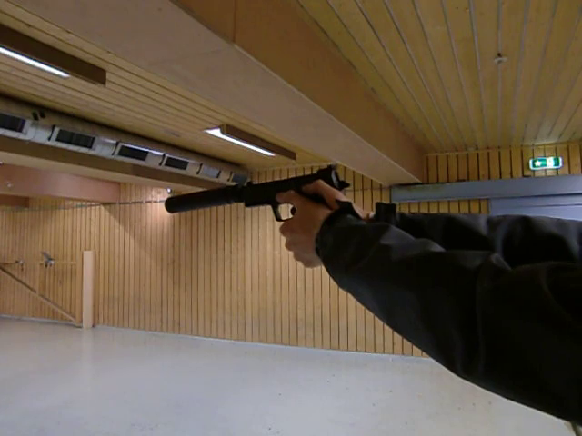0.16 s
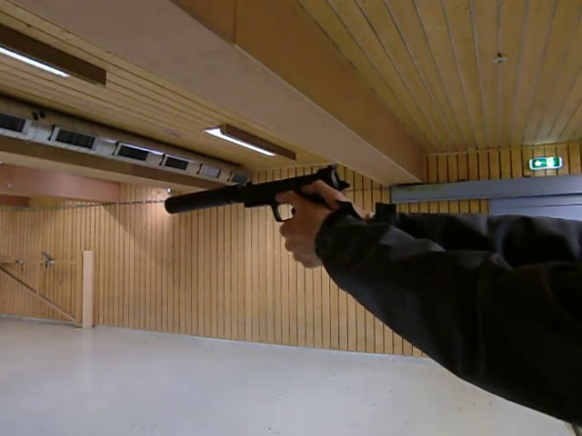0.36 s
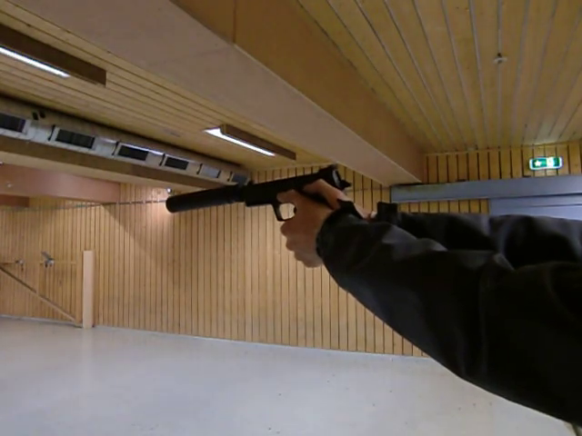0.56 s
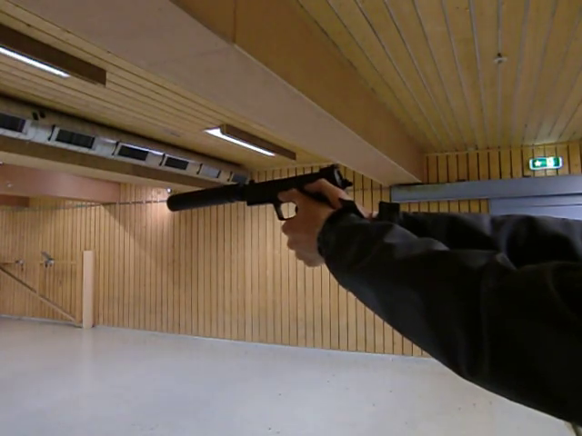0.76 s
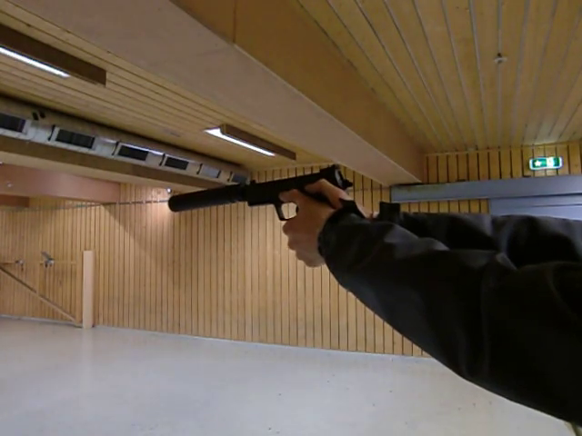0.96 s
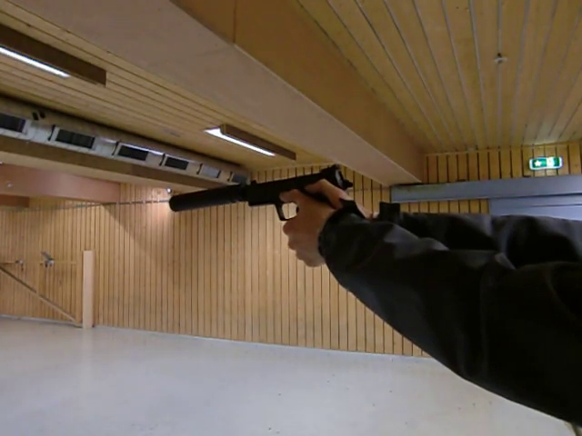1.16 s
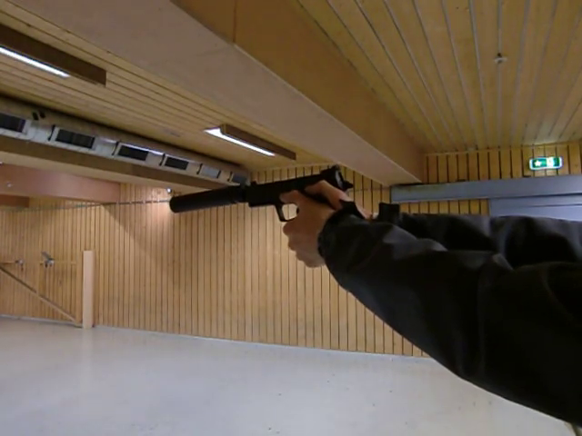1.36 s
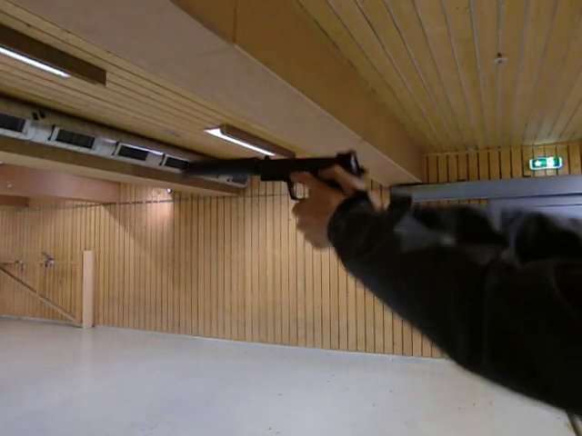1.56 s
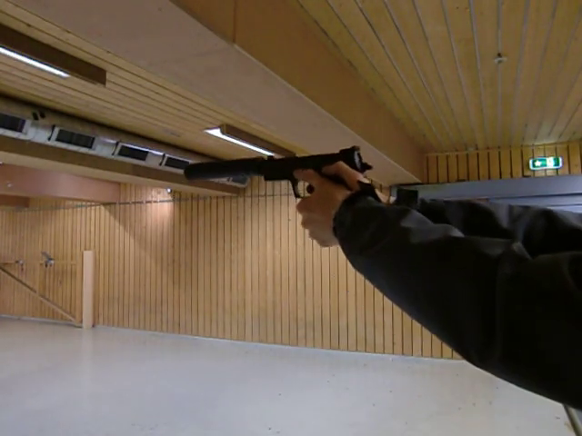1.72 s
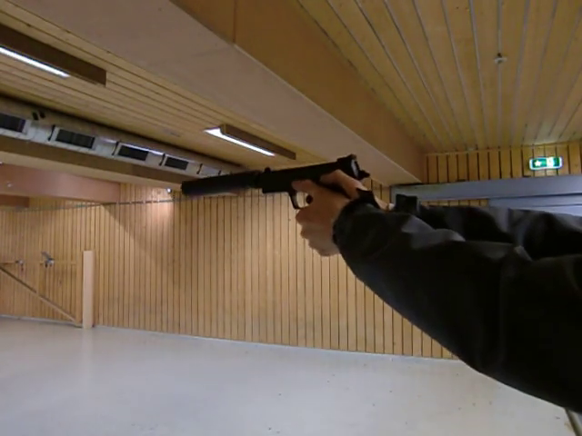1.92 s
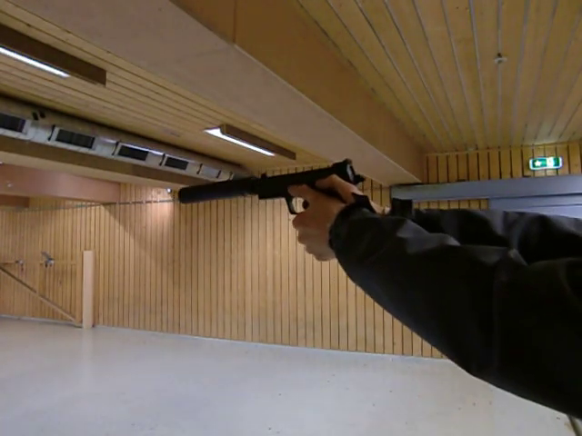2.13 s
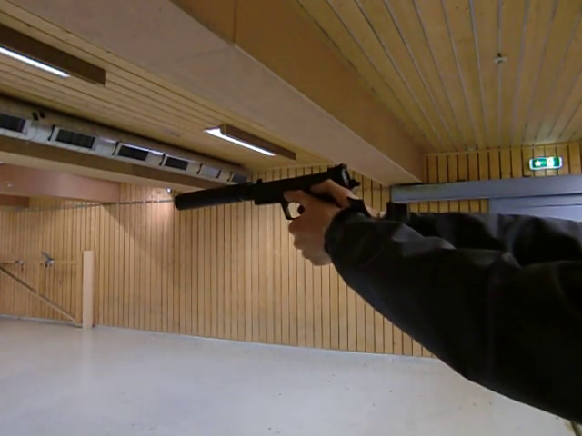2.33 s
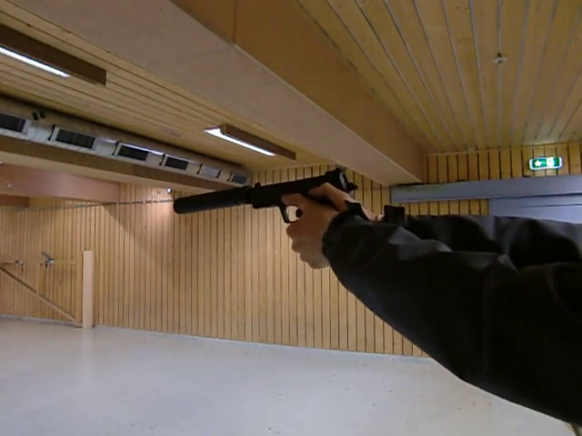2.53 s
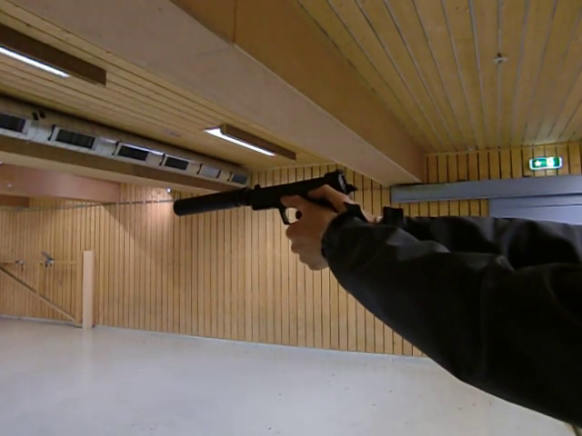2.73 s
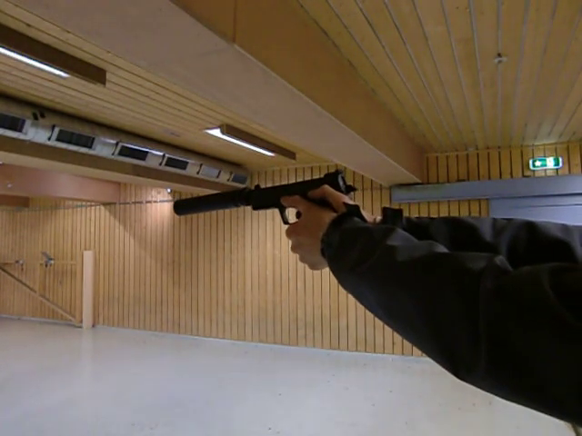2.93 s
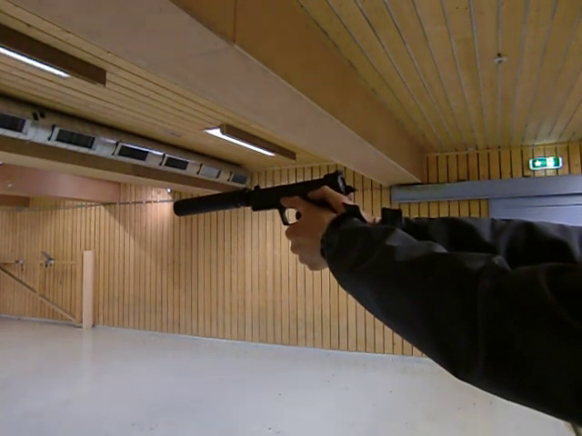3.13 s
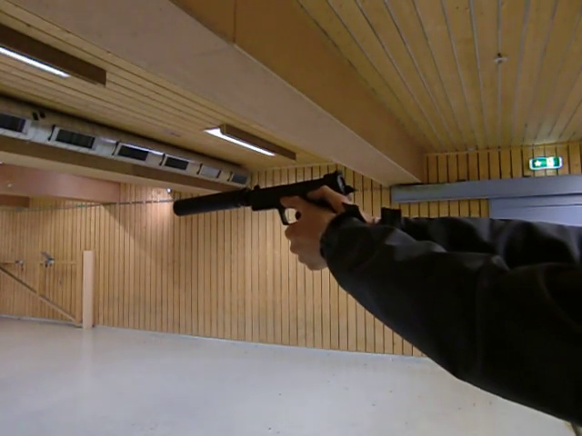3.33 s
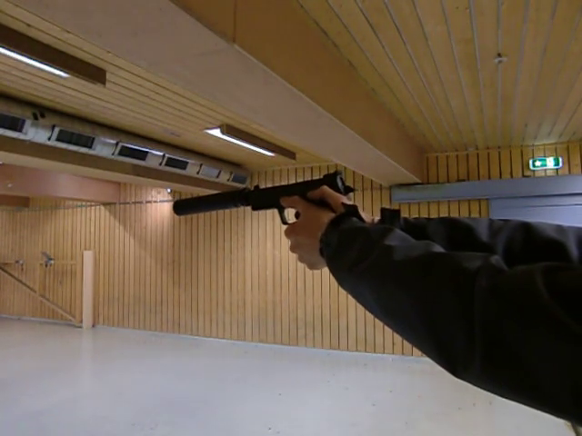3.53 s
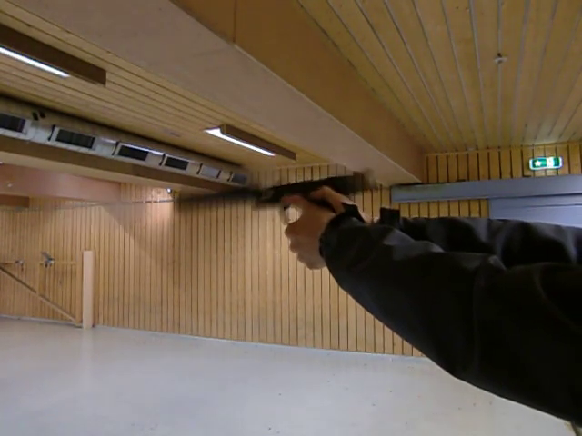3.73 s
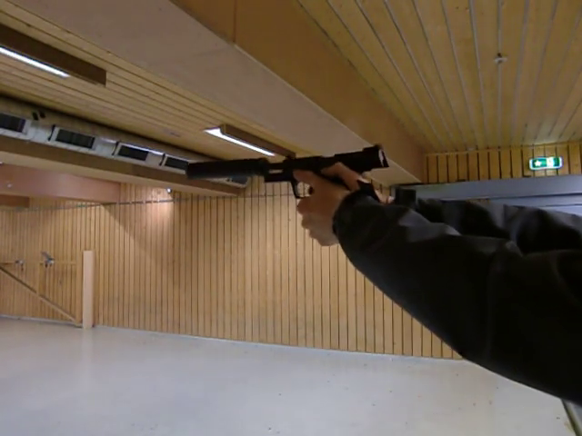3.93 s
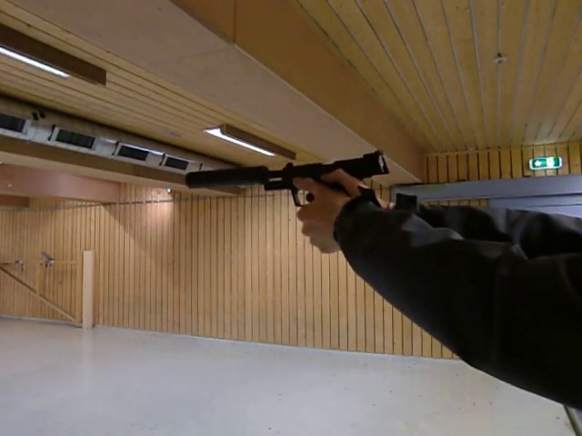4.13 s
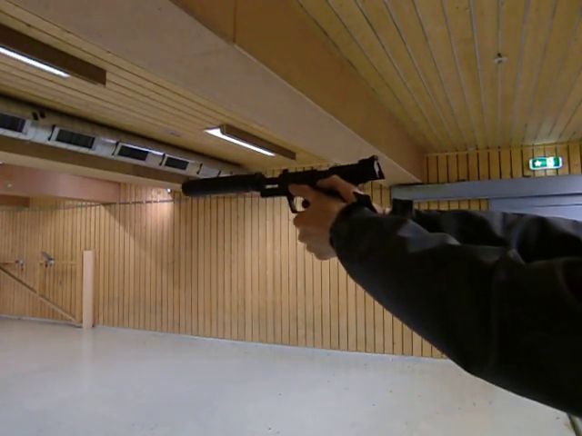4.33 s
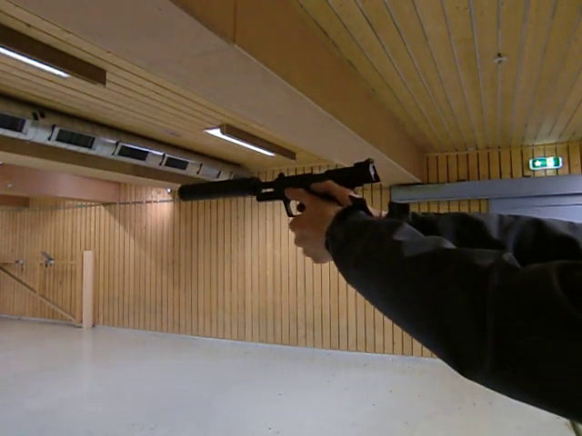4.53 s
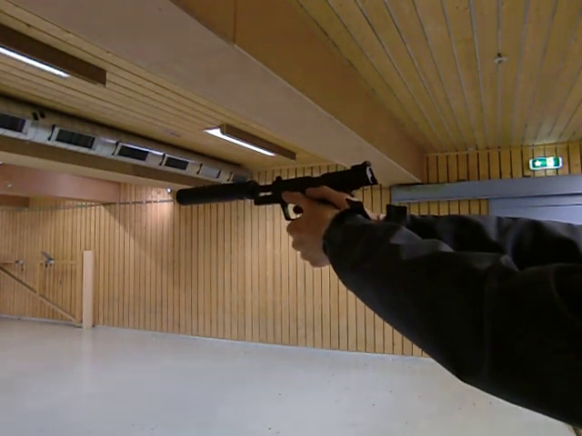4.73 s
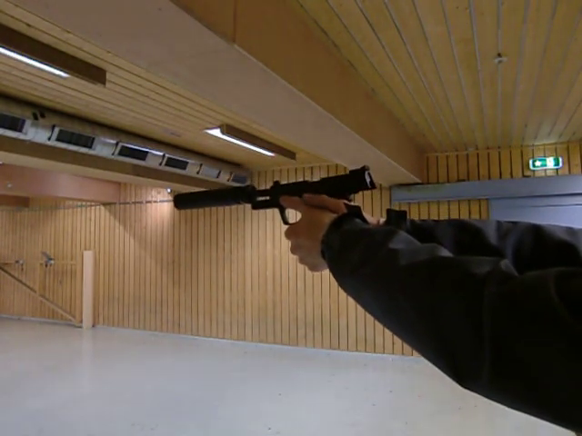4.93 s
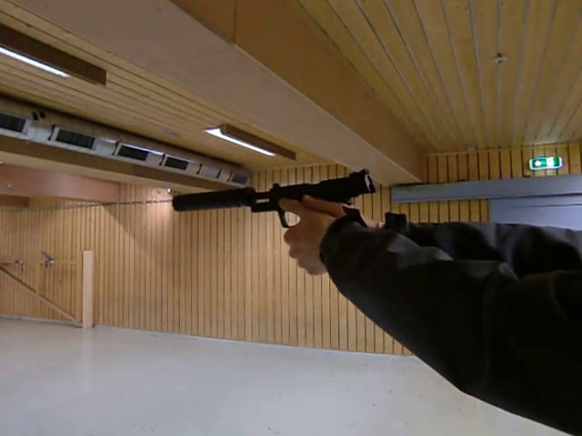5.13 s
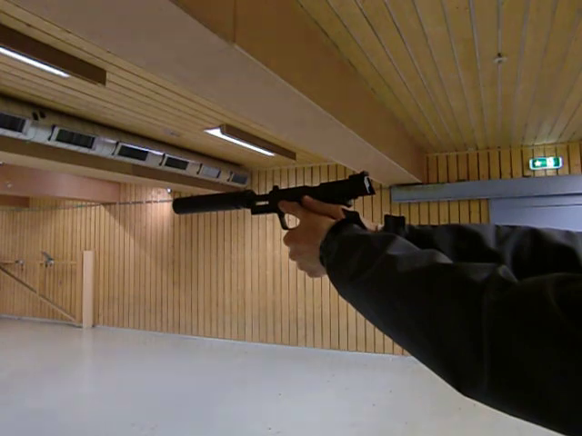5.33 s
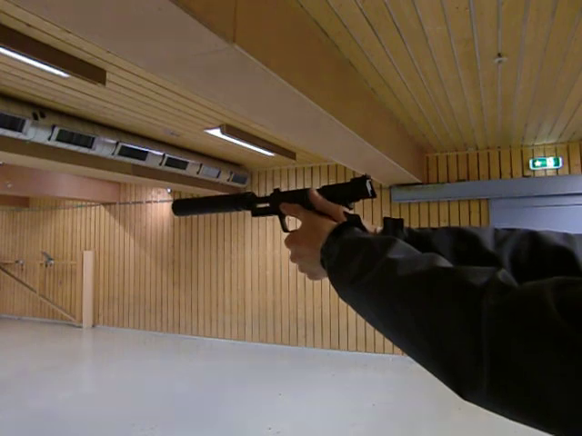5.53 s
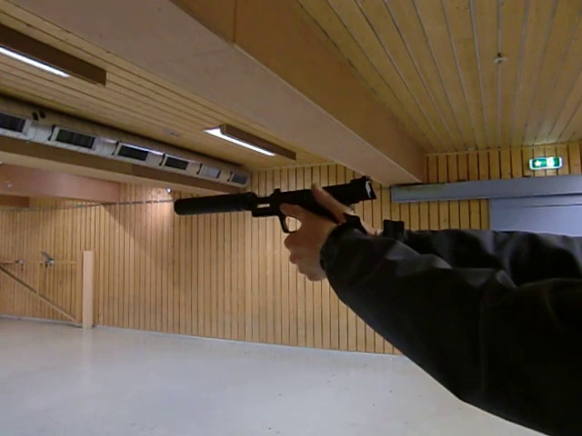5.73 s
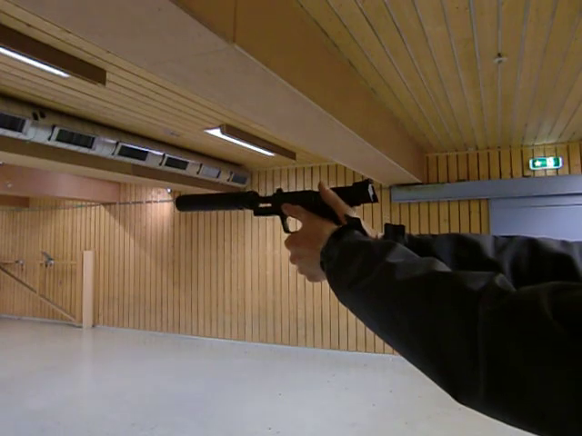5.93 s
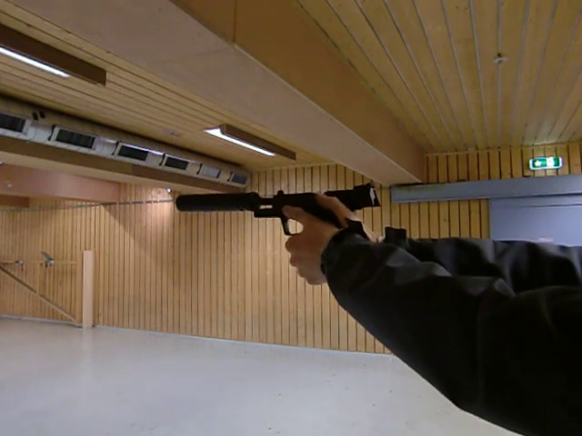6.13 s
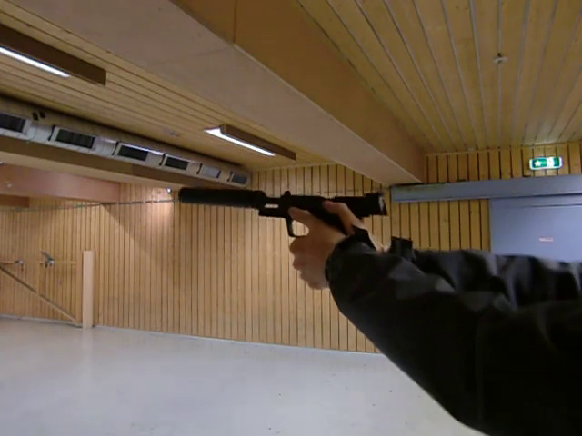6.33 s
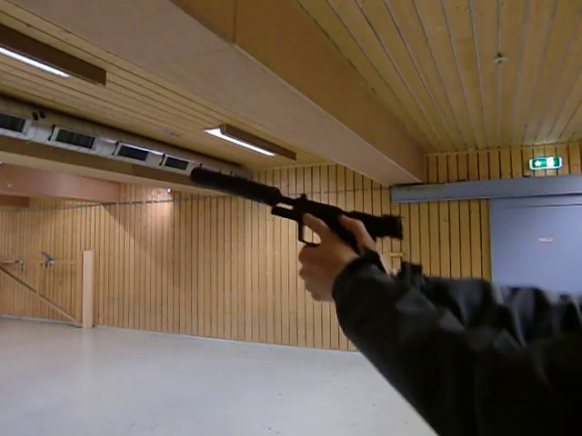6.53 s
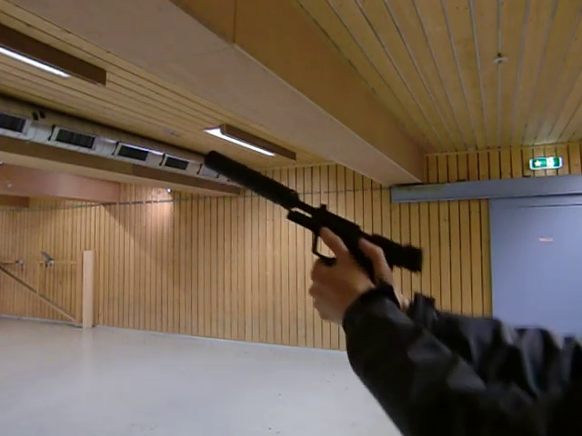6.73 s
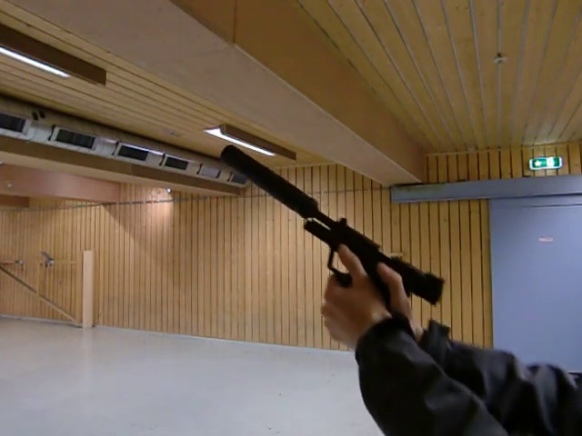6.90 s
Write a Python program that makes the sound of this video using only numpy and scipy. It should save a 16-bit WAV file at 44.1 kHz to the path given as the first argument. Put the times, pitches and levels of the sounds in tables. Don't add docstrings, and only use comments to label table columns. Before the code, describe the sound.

A small camera close to the shooter catches two suppressed pistol shots about two seconds apart, flattened and distorted, with slide clacks and far trap impacts buried in a dense room echo. High, thin brass rings follow each shot as cases hop over a hard floor. Near the end comes a crisp metallic snap, a fluttering roll of the second case and faint cloth rustle over quiet ventilation.

```python
import sys
import numpy as np
from scipy import signal
from scipy.fft import rfft, irfft, next_fast_len
from scipy.io import wavfile
from scipy.ndimage import map_coordinates

SR = 44100
rng = np.random.default_rng(int(sys.argv[2]) if len(sys.argv) > 2 else 0)


def output_pcm(signal):
    pcm = np.clip(np.atleast_2d(signal).T, -1, 1) * 32767
    wavfile.write(sys.argv[1], SR, np.round(pcm).astype(np.int16))


def makeup_ratio(level_db):
    decades = np.asarray(level_db, float) / 20
    return 10 ** decades


N = 307048

# start_s, blast_db, hammer_db, trap_s, trap_db
SHOT_EVENTS = [
    (1.4923, 3.5, -12.5, 1.635, -4),
    (3.7721, 4, -14.5, 3.895, 0),
]
# freq_hz, level_db (per Hz)
BLAST_COLOURS = [
    [(120, -53.5), (200, -24.5), (552, -11.5), (1330, -20), (1580, -7.5), (1870, -26), (2620, -4),
     (2900, -5), (5340, -9), (9340, -12.5), (11400, -23), (14900, -49), (22000, -120)],
    [(120, -35), (200, -8.5), (1180, -7), (1350, -14), (1780, 0), (2760, -5), (4210, 1), (6110, -4),
     (7240, -19), (8870, 4.5), (11400, -19), (14900, -46), (22000, -120)],
]
# freq_hz, level_db (per Hz)
ECHO_COLOURS = [
    [(71, -51.5), (120, -24.5), (422, -18), (619, -12), (1100, -13.5), (1230, -13.5), (2440, -9),
     (3570, -5.5), (9820, -9), (11400, -23.5), (14900, -57.5), (22000, -120)],
    [(71, -50), (120, -31), (323, -14.5), (694, -7.5), (941, -17.5), (1910, -6.5), (2020, -7), (4160, -1),
     (8930, -8), (11400, -22.5), (14900, -54.5), (22000, -120)],
]
# freq_hz, level_db (per Hz)
TRAP_COLOUR = [(71, -47), (120, -26), (323, -15), (407, -10), (1300, -7.5), (1770, -6), (2840, -0.5),
               (8590, -9), (11400, -20.5), (14900, -58.5), (22000, -120)]
# freq_hz, decay_s
RANGE_DECAY = [(200, .5), (700, 0.51), (2000, 0.79), (4000, 0.67), (8000, 0.48), (11500, 0.41)]
# delay_s, level_db
NEAR_ECHOES = [(.0046, -5.5), (0.011, -12.5), (0.02, -9.5), (0.022, -13), (.026, -14), (0.032, -10.5),
               (.039, -16.5), (0.053, -13.5)]
# start_s, floor_click_db, hollow_db, hollow_hz, wall_ring_db
CASE_BOUNCES = [
    (2.3322, -24.5, -28.5, 5350, -19.5),
    (2.9651, -32.5, -22.5, 5250, -32),
    (3.412, -37, -19, 4780, -31.5),
    (3.647, -41.5, -41, 4840, -28.5),
    (4.4971, -27.5, -14.5, 5396, -36),
    (4.9284, -28, -38.5, 5000, -18),
    (5.289, -39.5, -41.5, 4800, -23),
    (5.4504, -47, -29.5, 5300, -55),
    (5.7108, -44, -43, 4960, -31),
]
BRASS_PITCHES = [10375, 10430, 11660, 11600]
# level_db, decay_s (to fall 60 dB)
BRASS_RINGS = [(1.5, 0.075), (-1.5, 0.061), (-5.5, 0.028), (-6, 0.019)]
# start_s, length_s, ring_db, lost_db
ROLLS = [
    (4.07, 0.42, -44.5, 7.5),
    (5.593, .11, -46.5, 22),
    (5.707, 0.224, -42.5, 12),
    (5.931, .3, -45, 3),
    (6.409, 0.14, -48.5, 28.5),
]
# start_s, ring_db, hollow_db (relative to the ring)
RIM_TAPS = [(5.7717, -29.5, -8), (5.8446, -42, -5), (5.8719, -34, -7), (5.889, -33, -10), (5.9315, -29, -8),
            (5.9446, -33.5, -4), (5.9696, -40, -14), (6.029, -31.5, -21), (6.0787, -26, -27.5),
            (6.1164, -30.5, -22.5), (6.1983, -37, -13.5), (6.242, -58, -15.5), (6.2894, -46.5, -12.5),
            (6.321, -40.5, -9.5), (6.344, -37, -11.5), (6.404, -42, -15.5), (6.4797, -42.5, -8),
            (6.541, -65.5, -6), (6.6012, -53, 2), (6.6822, -55, -0.5)]
# start_s, peak_db, pitch_hz, width_hz
HANDLING_TICKS = [
    (1.366, -41, 3100, 400),
    (3.708, -37, 3100, 500),
    (3.717, -39, 2900, 400),
    (3.724, -42, 2500, 300),
    (3.7425, -32, 2800, 500),
    (3.752, -41, 2700, 350),
    (5.70, -36, 2500, 250),
    (6.035, -39, 1000, 120),
]
# start_s, peak_db, pitch_hz, width_hz
SLIDE_STOPS = [(1.5335, 9, 5500, 300), (1.541, 12, 9000, 150), (1.5485, 9, 2800, 250),
               (1.564, 9, 4500, 900), (3.8125, 9, 4000, 300), (3.822, 8, 4000, 400), (3.893, 9, 4000, 700),
               (3.8995, 10, 4200, 600), (3.9115, 9, 3500, 900)]
# pitch_hz, width_hz, level_db
CATCH_RINGS = [(3350, 1200, .5), (5400, 1500, -2), (9000, 2500, -8), (1900, 1000, -6)]
# delay_s, level_db, length_ms
CATCH_RATTLES = [
    (.0006, -9, 2.23),
    (.0032, -4, 2.3),
    (.0066, -5.5, 2.3),
    (.0095, -21, 3),
    (0.015, -10, 1.5),
]
# freq_hz, level_db (per Hz)
AIR_COLOUR = [(65, -33), (110, -9), (266, -3), (398, -6.5), (447, -8.5), (655, -8), (708, -8), (874, -13),
              (1280, -13.5), (1710, -17), (5410, -24), (7500, -23), (10800, -27.5), (14000, -63.5),
              (22000, -120)]
# freq_hz, level_db (per Hz)
DRAUGHT_COLOUR = [(8.8, -23.5), (15, 0.5), (59, -4.5), (72, -6.5), (87, -17.5), (130, -18), (170, -51),
                  (290, -120)]
# freq_hz, level_db (per Hz)
CLOTH_COLOUR = [(300, -120), (600, 5.5), (1500, -0.5), (3000, -3.5), (8000, -5.5), (10500, -8.5),
                (12000, -40)]


def shots():
    out, t = np.zeros(N), np.arange(SR) / SR
    for shot, blast, echo in zip(SHOT_EVENTS, BLAST_COLOURS, ECHO_COLOURS):
        s, blast_db, hammer_db, trap_s, trap_db = shot

        knock = np.exp(-((t - 0.0025) / 0.0018) ** 2) + 0.43 * (t < 0.006)
        hammer = knock * (t < 0.01) * noise(echo, count=SR)
        add(out, s - 0.0058, makeup_ratio(hammer_db) * hammer)

        slow_gas = makeup_ratio(blast_db - 60 * t / 0.14)
        sharp_gas = makeup_ratio(blast_db + 4 - 60 * t / 0.015)
        add(out, s, (slow_gas + sharp_gas) * noise(blast, count=SR))

        thump = np.sin(2 * np.pi * 255 * t)
        add(out, s, makeup_ratio(blast_db - 21 - 60 * t / 0.13) * thump)

        long_echo = fading(noise(echo, count=2 * SR), rise_s=0.012)
        add(out, s, makeup_ratio(blast_db + 2) * long_echo)
        trap_hit = fading(noise(TRAP_COLOUR, count=2 * SR), rise_s=0.026)
        add(out, trap_s - 0.01, makeup_ratio(trap_db) * trap_hit)
    return out


def cases():
    out = np.zeros(N)
    for s, floor_db, hollow_db, hollow_hz, ring_db in CASE_BOUNCES:
        skid_ms = 0.96 * makeup_ratio(1.25 * (ring_db - floor_db))

        floor = click(lambda f: resonance(f, 6000, 12000) + resonance(f, 650, 1500))
        tick = makeup_ratio(floor_db + 15.5) * floor
        puff = click(lambda f: resonance(f, hollow_hz, 480) + 0.068 * resonance(f, 1.4 * hollow_hz, 1600))
        hollow = makeup_ratio(hollow_db + 6.5) * puff
        wall = makeup_ratio(ring_db - 2.5) * ring(skid_ms)

        landing = tick + hollow + makeup_ratio(-2) * wall
        add(out, s, in_range(landing, skid_ms, walls_db=7, wet_db=4.5, rise_s=0.0014))
        add(out, s, makeup_ratio(6) * wall + makeup_ratio(-4.5) * hollow)
        add(out, s - 0.005, makeup_ratio(floor_db - 6.5) * click(lambda f: resonance(f, 2500, 4000)))
    return out


def ring(attack_ms):
    t = np.arange(SR // 4) / SR
    modes = np.zeros(len(t))
    for hz, (db, decay_s) in zip(BRASS_PITCHES, BRASS_RINGS):
        modes += makeup_ratio(db - 60 * t / decay_s) * np.sin(2 * np.pi * hz * t)
    return modes * (1 - np.exp(-1000 * t / attack_ms))


def rolling():
    level = np.zeros(N)
    for s, length_s, db, lost_db in ROLLS:
        after = since(s)
        level += makeup_ratio(db - lost_db * after / length_s) * (after > 0) * (after < length_s)

    scattered = (rng.random(N) < 250 / SR) * makeup_ratio(2.3 * rng.standard_normal(N))
    blows = makeup_ratio(-24.5) * level * unit(scattered)
    puffs = makeup_ratio(2.5) * blows
    for s, ring_db, hollow_db in RIM_TAPS:
        blows[round(s * SR)] += makeup_ratio(ring_db - 8)
        add(puffs, s, makeup_ratio(ring_db + hollow_db + 9.5) * chatter(4))

    hollow = click(lambda f: resonance(f, 4860, 1100) + 0.15 * resonance(f, 6000, 8300))
    rattle = signal.fftconvolve(blows, ring(1.4)) + signal.fftconvolve(puffs, hollow)
    return in_range(rattle, 0, walls_db=-6, wet_db=-5.5, rise_s=0.0092)[:N]


def gun_parts():
    out = np.zeros(N)
    for s, db, hz, width_hz in HANDLING_TICKS:
        add(out, s, makeup_ratio(db) * in_range(steel_part(hz, width_hz), 0, walls_db=-6, wet_db=-8, rise_s=0.02))
    for s, db, hz, width_hz in SLIDE_STOPS:
        add(out, s, makeup_ratio(db) * steel_part(hz, width_hz))

    catch_s = 5.507
    snap = makeup_ratio(-1.5) * click(catch_response)
    add(out, catch_s, in_range(snap, 0, walls_db=-25, wet_db=-8.5, rise_s=0.024))
    add(out, catch_s, makeup_ratio(-15) * click(lambda f: resonance(f, 700, 1020)))
    for delay_s, db, length_ms in CATCH_RATTLES:
        add(out, catch_s + delay_s, makeup_ratio(db) * signal.fftconvolve(snap, chatter(length_ms)))
    return out


def steel_part(pitch_hz, width_hz):
    def response(f):
        body = resonance(f, pitch_hz, width_hz) * resonance(f, pitch_hz, 4 * width_hz)
        return body + 0.1 * resonance(f, 7000, 3000)
    return click(response)


def catch_response(f):
    total = 0
    for k, (pitch_hz, width_hz, db) in enumerate(CATCH_RINGS):
        total = total + (-1) ** k * makeup_ratio(db) * resonance(f, pitch_hz, width_hz)
    return total * resonance(f, 4200, 9000)


def background():
    sleeve_s = 6.26
    rustle = makeup_ratio(-59.5 + 8.5 * since(sleeve_s))
    cloth = rustle * (since(sleeve_s - 0.25) > 0) * noise(CLOTH_COLOUR, count=N)
    air = makeup_ratio(-53.5) * noise(AIR_COLOUR, count=N)
    rumble = noise(DRAUGHT_COLOUR, count=N)

    gusts_per_s, push_s = 4.1, 0.27
    gusts = map_coordinates(rng.standard_normal(64), [np.arange(N) * gusts_per_s / SR])
    push = np.zeros(N)
    for s, *_ in SHOT_EVENTS:
        push += since(s) / push_s * np.exp(1 - since(s) / push_s)
    draught = makeup_ratio(-48.5 + 1.94 * gusts + 2 * push) * rumble
    return air + draught + cloth


def in_range(dry, skid_ms, walls_db, wet_db, rise_s):
    tail = fading(rng.standard_normal(SR * 2 // 3), rise_s)
    answer = makeup_ratio(wet_db) * tail / np.linalg.norm(tail)
    add(answer, 0, chatter(skid_ms))
    for delay_s, db in NEAR_ECHOES:
        add(answer, delay_s, makeup_ratio(db + walls_db) * chatter(skid_ms + 60 * delay_s))
    return signal.fftconvolve(dry, answer)


def fading(x, rise_s):
    hz, t, z = signal.stft(x, SR, nperseg=256)
    decay_s = along(RANGE_DECAY, hz)[:, None]
    tail = signal.istft(z * makeup_ratio(-60 * t / decay_s), SR, nperseg=256)[1][:len(x)]
    seconds = np.arange(len(x)) / SR
    return tail * (1 - np.exp(-(seconds / rise_s) ** 2))


def chatter(ms):
    t = np.arange(SR // 25) / SR
    burst = rng.standard_normal(len(t)) * np.exp(-1000 * t / max(ms, 0.01))
    return burst / np.linalg.norm(burst)


def click(response):
    blow = filtered(np.eye(1, SR // 4)[0], response)
    return blow / np.abs(blow).max()


def resonance(hz, centre_hz, width_hz):
    return 1j * hz * width_hz / (centre_hz ** 2 - hz ** 2 + 1j * hz * width_hz)


def noise(colour, count):
    return unit(filtered(rng.standard_normal(count), lambda hz: makeup_ratio(along(colour, hz))))


def filtered(x, response):
    m = next_fast_len(len(x) + 8192)
    return irfft(rfft(x, m) * response(np.fft.rfftfreq(m, 1 / SR)), m)[:len(x)]


def along(points, hz):
    f, v = np.transpose(points)
    return np.interp(np.log(hz + 1), np.log(f + 1), v)


def unit(x):
    return x / np.sqrt(np.mean(x ** 2) + 1e-20)


def add(track, s, sound):
    at = track[round(s * SR):][:len(sound)]
    at += sound[:len(at)]


def since(s):
    return np.maximum(np.arange(N) / SR - s, 0)


def scene():
    return (shots() + cases() + rolling() + gun_parts() + background())[None]


def top_cut(x):
    return signal.sosfilt(signal.butter(12, 11800, fs=SR, output="sos"), x)


def record(dry):
    duck_db, attack_s, recover_s = 15, 0.0084, 0.35
    duck = np.zeros(N)
    for s, *_ in SHOT_EVENTS:
        grip = 1 - np.exp(-since(s) / attack_s)
        release = np.maximum(1 - (since(s) / recover_s) ** 1.7, 0)
        duck += grip * release
    gain = makeup_ratio(-duck_db * duck)

    bass = filtered(dry[0], lambda hz: 1 / (1 + (hz / 110) ** 4))
    held = (dry[0] - bass) * gain
    overloaded = held / (1 + np.abs(held / 4.2) ** 4) ** (1 / 4) + bass
    band = filtered(overloaded, lambda hz: 1 / (1 + (hz / 11800) ** 60))
    mix = np.clip(band, -1, 1)[None]
    return top_cut(mix)


dry = scene()
out = record(dry)
output_pcm(out)
```